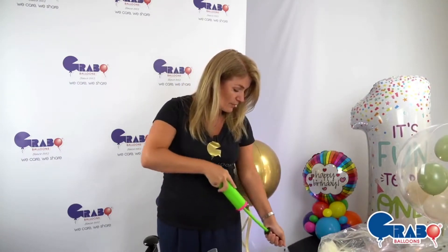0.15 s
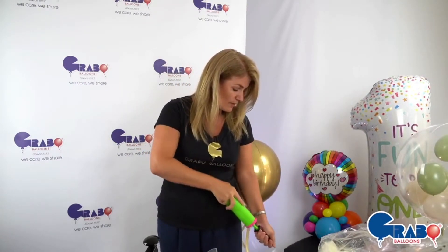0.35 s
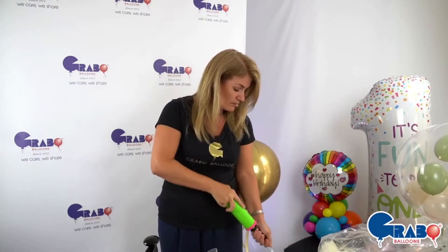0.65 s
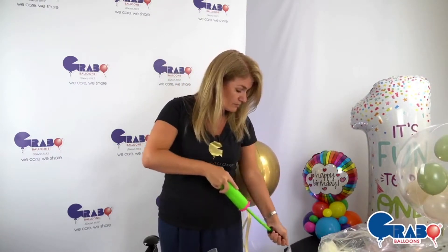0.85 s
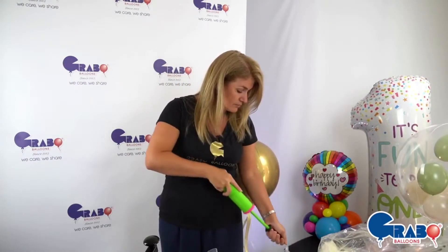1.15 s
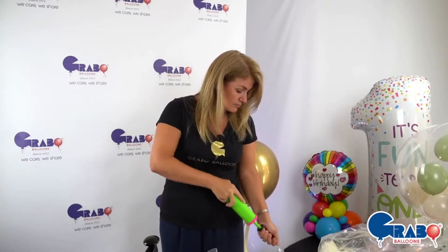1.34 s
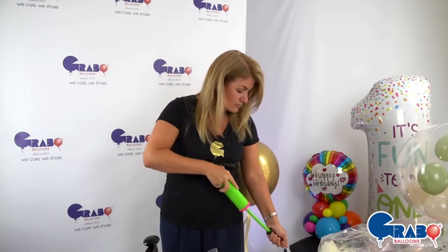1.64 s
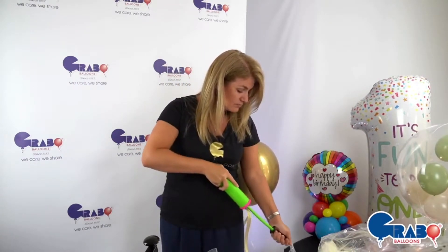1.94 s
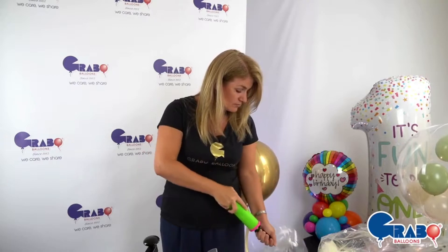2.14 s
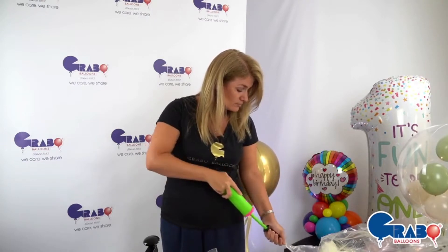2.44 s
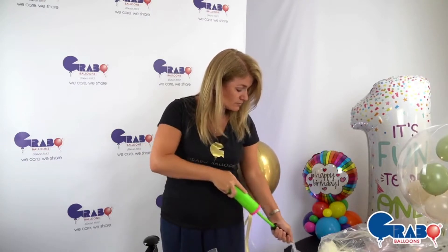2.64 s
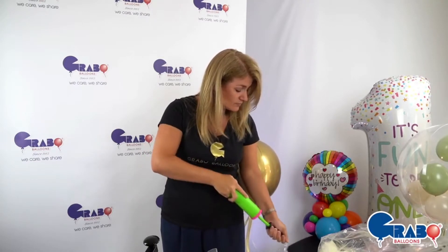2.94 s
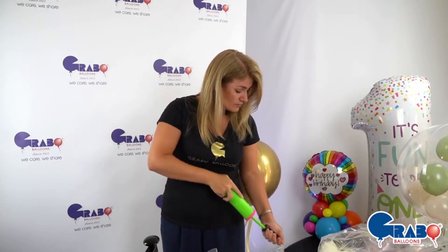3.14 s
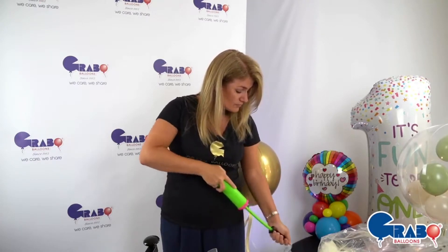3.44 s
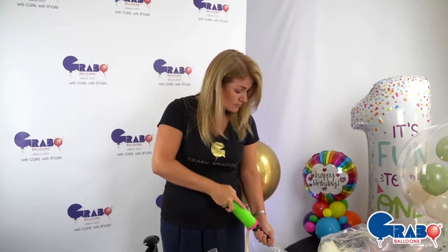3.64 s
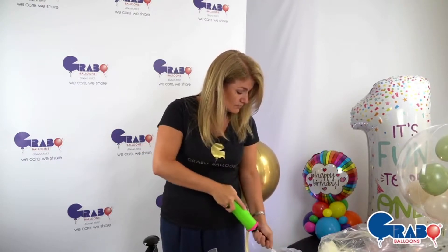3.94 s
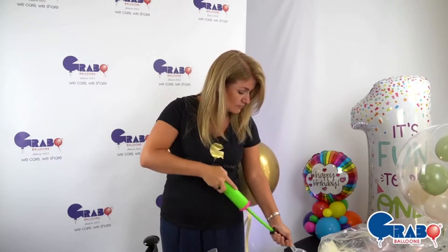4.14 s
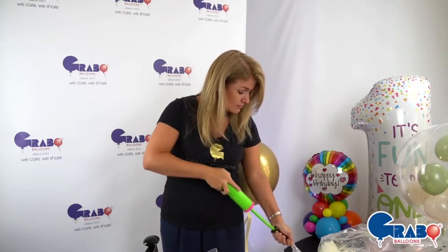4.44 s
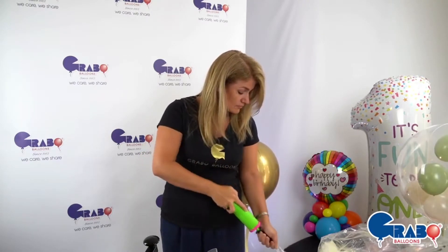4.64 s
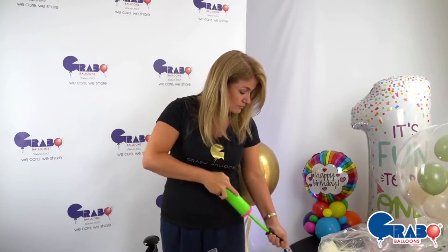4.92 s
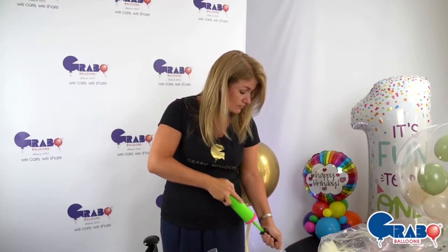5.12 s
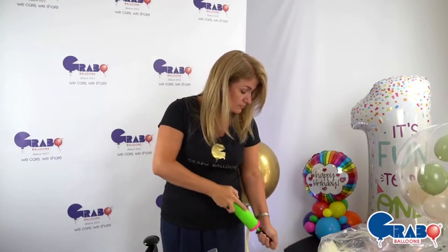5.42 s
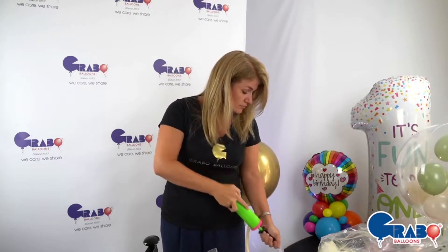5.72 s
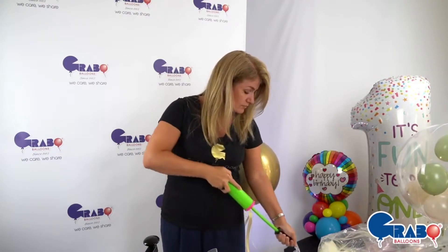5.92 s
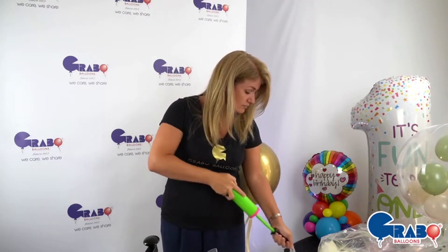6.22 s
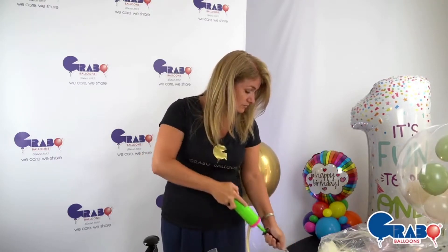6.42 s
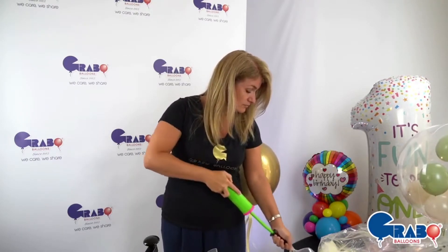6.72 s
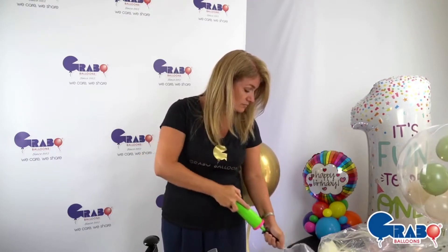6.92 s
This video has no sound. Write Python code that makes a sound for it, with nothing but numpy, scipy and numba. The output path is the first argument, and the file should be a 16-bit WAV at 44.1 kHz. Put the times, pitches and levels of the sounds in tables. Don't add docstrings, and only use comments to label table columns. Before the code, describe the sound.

A plastic hand pump works in brisk, steady back-and-forth strokes, rasping air into a crackling foil balloon, with clicks and knocks at each end.

```python
import sys
import numpy as np
from scipy import signal
from scipy.fft import rfft, irfft, next_fast_len
from scipy.io import wavfile
from scipy.ndimage import uniform_filter1d
from numba import njit

SR = 44100
rng = np.random.default_rng(int(sys.argv[2]) if len(sys.argv) > 2 else 0)


def invert_db(level):
    return 10 ** (np.asarray(level, dtype=float) / 20)


def output_pcm(signal):
    pcm = np.clip(np.atleast_2d(signal).T, -1, 1) * 32767
    wavfile.write(sys.argv[1], SR, np.round(pcm).astype(np.int16))


N = 311654
T = np.arange(N) / SR
POP_DELAY_S = 0.0018
# start in seconds, thump, middle, snap and shudder levels in dB.
POPS = [(1.893, -36, -2, -31, 5), (2.1937, -4, -1.5, -24, 3.5), (2.874, -20, -44, -24, 6),
        (2.924, -23.5, -40, -25, 7), (2.958, -17, -37, -13.5, 1), (3.065, -28, -18, -15, 9.5),
        (3.632, -29, -18, -19, 6), (3.678, -6, -36, -26, -8), (3.799, -25, -35, -11.5, 4),
        (4.01, -14.5, -9, -5, 4.5), (4.1294, -3, 4, -3, -1.5), (4.286, -16.5, -9.5, -9.5, 3),
        (4.328, -40, -19, -34, 1), (4.5, -13.5, -8.5, -10, -13), (4.664, -11.5, -18, -5, 0),
        (4.825, -11.5, -11.5, -9, 5), (5.024, -23, -29, -14, 1), (5.054, -18.5, -13, -8.5, 1),
        (5.3932, -4, 1, -4, -1), (5.574, -9.5, 0.5, -8, 1), (5.791, -20, -14, -15, 1),
        (5.801, -21, -9.5, -8, -11), (6.547, -10, -11.5, -2, 2), (6.676, -17, -27, -14, -11),
        (6.719, -18, -16, -19, -1), (6.79, -23, -31, -28, 1), (6.917, -15, -31, -19, -0.5),
        (7.048, -13.5, -21, -9, -5)]


def rms_one(x):
    return x / np.sqrt(np.mean(x ** 2) + 1e-20)


def at_hz(points, hz):
    table_hz, table_db = np.transpose(points)
    return np.interp(np.log(hz), np.log(table_hz), table_db)


def colour(x, points):
    size = next_fast_len(N)
    hz = np.arange(1, size // 2 + 2) * SR / size
    return irfft(rfft(x, size) * invert_db(at_hz(points, hz)), size)[..., :N]


def band(x, low_hz, high_hz, order=2):
    sos = signal.butter(order, [low_hz, min(high_hz, .45 * SR)], "band", fs=SR, output="sos")
    return signal.sosfilt(sos, x)


def drift(rate_hz):
    r = np.exp(-80 * np.pi * rate_hz / SR)
    slow = signal.lfilter([1], [1, -2 * r, r * r], rng.standard_normal(N // 40 + 2002))[2000:]
    return np.interp(np.arange(N) / 40, np.arange(len(slow)), rms_one(slow))


def ring(clicks, hz, t60_s):
    r, w = invert_db(-60 / (t60_s * SR)), 2 * np.pi * hz / SR
    return signal.lfilter([0, np.sin(w)], [1, -2 * r * np.cos(w), r * r], clicks + 1e-18)


def blows(times, db, contact_s=0.):
    out = np.zeros(N + 999)
    scatter = rng.random((len(times), 4, 2))
    for k, share in enumerate([0.89, -0.99, 1.0, 0.66] if contact_s else [1]):
        delay_s = contact_s * (k + scatter[:, k, 0] * (k > 0))
        at = ((np.asarray(times) + delay_s) * SR).astype(int)
        np.add.at(out, at, invert_db(db) * share * (1 if k == 0 else .5 + scatter[:, k, 1]))
    return out[:N]


@njit
def sweep(x, hz, r, sr):
    out = np.zeros_like(x)
    for i in range(2, len(x)):
        drive = (1 - r * r) / 2 * (x[i] - x[i - 2])
        out[i] = drive + 2 * r * np.cos(2 * np.pi * hz[i] / sr) * out[i - 1] - r * r * out[i - 2]
    return out


def swell(s, spread_s):
    return np.exp(-np.abs(T - s) / max(spread_s, .003))


def strokes():
    # start and stop in seconds, crest and stop levels in dB.
    pull_rows = [(0.006, 0.052, -28.5, -34), (0.27, 0.39, -23, -29.5), (0.621, 0.76, -24.5, -32.5),
                 (0.975, 1.102, -25.5, -25.5), (1.352, 1.483, -26.5, -27), (1.724, 1.905, -25, -30),
                 (2.101, 2.186, -34, -23), (2.492, 2.64, -25.5, -38), (2.833, 3.0, -27, -30.5),
                 (3.198, 3.35, -19.5, -35), (3.562, 3.63, -28, -24), (3.91, 4.04, -26, -29.5),
                 (4.268, 4.39, -21.5, -32.5), (4.622, 4.729, -26.5, -26), (4.976, 5.1, -27, -32),
                 (5.347, 5.47, -28, -29.5), (5.708, 5.821, -24.5, -29), (6.063, 6.16, -29.5, -27),
                 (6.437, 6.56, -28, -24), (6.804, 6.93, -28, -29.5)]
    # start and stop in seconds, crest and stop levels in dB.
    push_rows = [(0.075, 0.177, -26, -27), (0.431, 0.55, -29.5, -30.5), (0.793, 0.907, -26, -32.5),
                 (1.155, 1.284, -28.5, -27.5), (1.524, 1.692, -22.5, -34), (1.898, 2.064, -26, -29),
                 (2.326, 2.45, -30, -35.5), (2.657, 2.802, -26, -32.5), (3.015, 3.116, -28, -27.5),
                 (3.366, 3.454, -28.5, -24), (3.71, 3.85, -41, -32), (4.073, 4.191, -29.5, -25.5),
                 (4.431, 4.53, -27.5, -29), (4.795, 4.936, -25, -33.5), (5.159, 5.253, -27, -24),
                 (5.515, 5.666, -28.5, -28.5), (5.876, 5.988, -27.5, -27.5), (6.244, 6.386, -30, -31.5),
                 (6.638, 6.789, -30.5, -37.5), (6.993, 7.073, -31, -26)]
    pull_rise_s, push_rise_s = 0.046, 0.054
    start, stop, crest_db, stop_db = np.stack([pull_rows, push_rows], axis=1).reshape(-1, 4).T
    push = np.arange(len(start)) % 2 == 1
    crest = start + np.minimum(np.where(push, push_rise_s, pull_rise_s), 0.49 * (stop - start))
    return start, crest, stop, crest_db, stop_db, push


def flow(fall_db_s=330, deepest_db=17, lag_s=0.):
    # time in seconds, level in dB.
    neck_boom = [(0.0, -5), (0.8, 2.5), (1.5, -3.5), (2.15, 3), (2.4, -13), (2.58, -7), (2.9, 4),
                 (3.15, -4), (3.6, 4), (4.3, -2), (4.7, 4.5), (5.3, -2.5), (5.8, 3.5), (6.1, -1.5),
                 (6.7, 5), (7.07, 5.5)]
    push_boom_db = 3
    start, crest, stop, crest_db, stop_db, push = strokes()
    fall_db = np.clip(fall_db_s * (start[1:] - stop[:-1]), 0, deepest_db)
    rest_db = np.r_[crest_db[0], stop_db[:-1] - fall_db]
    times = np.maximum.accumulate(np.ravel([start + lag_s, crest + lag_s, stop + lag_s], "F"))
    speed_db = np.interp(T, times, np.ravel([rest_db, crest_db, stop_db], "F"))
    middle = (crest + stop) / 2
    boom_db = np.interp(middle, *np.transpose(neck_boom)) + push_boom_db * push
    return speed_db, np.interp(T, middle, boom_db)


def rush(patchy_db=2.5):
    # frequency in Hz, density in dB per Hz.
    rush_spectrum = [(150, -68), (239, -69), (381, -10), (700, -5.5), (900, -3.5), (1870, -0.5),
                     (8000, -13.5), (12300, -29)]
    jet_db, boom_db = flow()
    late_db = flow(fall_db_s=415, deepest_db=19.5, lag_s=0.00035)[0] + boom_db - 3.0
    out, together = 0, drift(16.0)
    white = colour(rng.standard_normal((2, 2, N)), rush_spectrum)
    edges_hz = 120 * 2 ** np.arange(0, 7.2, 1 / 3)
    for k, (low, high) in enumerate(zip(edges_hz, edges_hz[1:])):
        boomy = np.clip(np.log2(3800 / low) / 0.84, 0, 1)
        db = boomy * late_db + (1 - boomy) * jet_db
        db += patchy_db * (0.5 * together + 0.78 * drift(13.0))
        db += np.clip(np.log2(low / 7000), 0, 1) * 0.24 * (-25 - jet_db)
        db += (low > 3500) * 1.8 * drift(35)
        out = out + invert_db(db) * band(white[k % 2], low, high)
    return invert_db(-1.2) * out / np.std(band(white[0, 0], 3190, 10300, order=4))


def chamber():
    # start, end and width in Hz, level in dB.
    push_modes = [(3200, 2780, 420, -3), (1460, 1304, 290, -4.5), (4730, 5700, 320, -12)]
    # start and end in Hz, level in dB.
    pull_modes = [(1600, 1760, -8), (780, 600, -13.5), (3430, 3100, -30)]
    start, _, stop, _, _, push = strokes()
    times = np.maximum.accumulate(np.ravel([start, stop], "F"))
    out, jet_db = 0, flow()[0]
    for (push_from, push_to, width, push_db), (pull_from, pull_to, pull_db) in zip(push_modes, pull_modes):
        ends_hz = [np.where(push, push_from, pull_from), np.where(push, push_to, pull_to)]
        hz = np.interp(T, times, np.ravel(ends_hz, "F")) * invert_db(0.18 * drift(11.0))
        db = np.interp(T, times, np.where(push, push_db, pull_db).repeat(2))
        r = np.exp(-np.pi * width / SR)
        flutter_db = 2.2 * drift(12)
        noise = rng.standard_normal((2, N)).ravel()
        tone = rms_one(sweep(noise, np.tile(hz, 2), r, SR)).reshape(2, N)
        out = out + invert_db(jet_db + db + flutter_db) * tone
    return out


def whistle(centre_hz=8000., sag_hz_per_s=610):
    # peak in seconds, spread in seconds, level in dB.
    whistle_rows = [(0.13, 0.018, -26), (0.515, 0.014, -24), (0.845, 0.022, -28), (1.2, 0.0044, -27),
                    (1.575, 0.0068, -39), (3.068, 0.028, -34), (3.42, 0.013, -32.5), (3.795, 0.018, -32),
                    (5.256, 0.01, -24), (5.944, 0.013, -32), (6.315, 0.022, -27), (7.053, 0.0064, -20.5)]
    r, hz, gain = np.exp(-np.pi * 100 / SR), np.full(N, centre_hz), np.zeros(N)
    for s, spread_s, db in whistle_rows:
        near = np.abs(T - s) < 0.07
        hz[near] = centre_hz - sag_hz_per_s * (T[near] - s)
        gain += near * invert_db(db) * swell(s, spread_s)
    tone = sweep(sweep(rng.standard_normal(N), hz, r, SR), hz, r, SR)
    return uniform_filter1d(gain, size=500) * rms_one(tone)


def bottom_knocks():
    # start in seconds, peak in dB, low thud in dB.
    knock_rows = [(0.21, -14, -6), (0.5647, -14.5, -4.5), (0.916, -13.5, -5.5), (1.306, -13.5, -2.5),
                  (1.689, -19, 2.5), (2.0535, -15.5, 2), (2.4552, -30.5, 5.5), (2.7922, -15.5, -4.5),
                  (3.145, -17, -4), (3.499, -13, -4.5), (3.8754, -17.5, -6), (4.206, -11.5, -7),
                  (4.554, -15.5, -3), (4.9275, -13.5, -5), (5.2992, -17, -1), (5.659, -11, -5),
                  (6.01, -11.5, -7), (6.391, -21, 3)]
    # mode in Hz, t60 in seconds.
    barrel_modes = [(255, .03), (1124, .062), (2146, .075), (2720, .03)]
    s, db, thud_db = np.transpose(knock_rows)
    s = s + .0005
    touch = blows(s, db)
    out = invert_db(1.5) * ring(touch, 2240, 0.0071) - invert_db(-6.5) * ring(touch, 407, 0.024)
    mode_db = [thud_db, 2, -6 + rng.normal(0, 1.5, len(s)), -12]
    for (hz, t60_s), rel_db in zip(barrel_modes, mode_db):
        out += ring(blows(s + 0.00063, db + rel_db), hz, t60_s)
    return out


def cap_clicks():
    # start in seconds, peak in dB, pan in dB, ring in Hz.
    click_rows = [(0.03, -12.5, 1, 3300), (0.3902, -13, -1, 3250), (0.7426, -12, -1, 3150),
                  (1.1064, -8, -2, 3170), (1.4955, -3, -2.5, 3130), (1.946, -14, -1.06, 3180),
                  (2.6189, -8, -4.5, 2900), (2.9769, -6.5, -1, 3130), (3.3212, -10, -2, 3150),
                  (3.6955, -18, -1, 3150), (4.0439, -11, -2, 3050), (4.383, -9.5, -1, 3050),
                  (4.741, -10, -2, 3000), (5.108, -8, -5, 3090), (5.4717, -6.5, -2, 2940),
                  (5.8321, -8.5, -1, 2970), (6.1984, -8.5, -5, 2950), (6.549, -13, -1, 3030),
                  (6.931, -10, -1, 2950)]
    out = np.zeros((2, N))
    for s, db, pan_db, hz in click_rows:
        i = int(s * SR)
        hit = np.r_[invert_db(db), np.zeros(1500)]
        plastic = invert_db(-1) * ring(hit, 1.04 * hz, .009) + invert_db(-2) * ring(hit, .95 * hz, .009)
        plastic -= invert_db(-6) * ring(hit, .62 * hz, .007) + invert_db(-9) * ring(hit, .47 * hz, .006)
        click = invert_db(3) * plastic
        click += invert_db(-10.5) * ring(np.roll(hit, 110), 510, 0.0089) + invert_db(-14.0) * ring(hit, 277, 0.027)
        click = signal.sosfilt(signal.butter(4, 1.2 * hz, fs=SR, output="sos"), click)
        out[:, i:i + len(hit)] += click * invert_db([[pan_db / 2], [-pan_db / 2]])
    return out


def valve_ticks():
    # start in seconds, peak in dB.
    tick_rows = [(0.081, -18.5), (0.444, -23), (0.791, -19), (1.173, -19), (1.545, -10.5), (2.299, -22.5),
                 (2.67, -15), (3.02, -11), (3.375, -17.5), (3.748, -23), (4.089, -16.5), (4.442, -16),
                 (4.81, -15.5), (5.181, -15), (5.541, -12.5), (5.896, -13), (6.262, -12.5), (6.638, -19),
                 (7.012, -11.5)]
    s, db = np.transpose(tick_rows)
    out = ring(blows(s, db + 2.5), 1330, .01) - ring(blows(s, db - 1), 600, .009)
    return out + ring(blows(s, db - 12), 280, .02)


def seal_snaps():
    # start in seconds, peak in dB.
    snap_rows = [(0.251, -15.5), (0.604, -20.5), (0.963, -20), (1.343, -34), (1.71, -21), (2.088, -20),
                 (2.479, -26), (2.825, -29), (3.178, -27), (3.552, -24), (3.9, -25), (4.243, -21),
                 (5.4568, -12), (6.051, -24)]
    s, db = np.transpose(snap_rows)
    s = s + .001
    return ring(blows(s, db + 5.0), 600, 0.002) + ring(blows(s, db + 1), 1500, 0.003)


def squeaks(length_s=0.03):
    # time in seconds, peak in dB.
    squeak_rows = [
        (0.0722, -30),
        (1.1576, -30),
        (4.0805, -31),
        (4.4296, -31),
        (5.167, -25.5),
        (5.881, -29),
        (6.996, -28),
    ]
    out, t = np.zeros(N), np.arange(int(length_s * SR)) / SR
    hz = 1500 + 2250 * np.sin(np.pi / 2 * t / length_s)
    chirp = np.sin(2 * np.pi * np.cumsum(hz) / SR) * np.hanning(len(t))
    for s, db in squeak_rows:
        i = int((s - .009) * SR)
        out[i:i + len(t)] += invert_db(db - 2.5) * chirp
    return out


def pops(shudder_t60_s=0.17, shudder_gain_db=-28.5, puff_hz=67, puff_db=0.5):
    # mode in Hz, level in dB, t60 in seconds.
    skin_modes = [(292, -9, 0.14), (398, -5.5, 0.077), (245, -16, 0.037), (550, -28, 0.016),
                  (720, -1, 0.012)]
    s, thump_db, _, _, shudder_db = np.transpose(POPS)
    s = s + POP_DELAY_S
    shakes = np.abs(blows(s + 0.0023, thump_db + shudder_gain_db + shudder_db))
    fade = signal.lfilter([1], [1, -invert_db(-60 / (shudder_t60_s * SR))], shakes)
    out = sum(invert_db(db) * ring(fade * rng.standard_normal(N), hz, t60_s) for hz, db, t60_s in skin_modes)
    out += ring(blows(s + 0.00406, thump_db - 9.5), 297.6, 0.062)
    out += ring(blows(s + 0.0038, thump_db - 12.5), 404, 0.05)
    out += ring(blows(s + 0.00036, thump_db + 9), 365, .014) - ring(blows(s, thump_db - 9), 662, 0.019)
    out += ring(blows(s, 0.87 * thump_db + puff_db), puff_hz, 0.029)
    return signal.lfilter([.15], [1, -.85], out)


def cracks():
    # start in seconds, middle and snap levels in dB.
    crease_rows = [(0.656, -39, -16), (1.907, -13.5, -28), (3.223, -38, -15), (3.631, -28, -17),
                   (4.642, -36, -17), (4.891, -24, -6.5), (5.007, -30, -22), (6.133, -23, -29),
                   (6.342, -22, -10), (6.357, -35, -8), (6.471, -42, -9), (6.891, -22, -25)]
    folds = np.transpose(POPS)[[0, 2, 3]]
    s, middle_db, snap_db = np.c_[folds, np.transpose(crease_rows)]
    s = s + POP_DELAY_S
    out = ring(blows(s, middle_db - 1.0, contact_s=0.00068), 830, 0.008)
    out += ring(blows(s, snap_db - 0.5, contact_s=0.000801), 1800, 0.0035)
    return out + ring(blows(s, snap_db - 9, contact_s=0.00047), 2900, 0.002)


def low_bumps():
    # start in seconds, peak in dB.
    bump_rows = [
        (1.495, -14),
        (2.196, 19.5),
        (4.011, -15),
        (4.133, -8),
        (4.34, -9),
        (4.5, -15),
        (5.395, 10),
        (5.808, 0.5),
        (5.95, -9),
    ]
    push = signal.lfilter([.01], [1, -.99], blows(*np.transpose(bump_rows)))
    return ring(push, 37, 0.045)


def pings():
    # start in seconds, peak in dB, pitch in Hz, t60 in seconds.
    ping_rows = [(0.117, -17.5, 2900, 0.035), (1.588, -17, 1174, 0.072), (4.3017, -9.5, 1190, 0.071),
                 (5.042, -15.5, 1670, 0.048), (5.6198, -29, 2780, 0.032), (5.933, -23, 1370, 0.047),
                 (5.952, -28, 1330, 0.062), (5.982, -15.5, 3020, 0.078), (6.351, -9, 1283, 0.046),
                 (2.1961, 2, 370, 0.025), (6.549, -8.5, 2020, 0.045), (6.913, -11, 1450, 0.02),
                 (6.926, -11.5, 890, 0.035)]
    return sum(ring(blows([s], db), hz, t60_s) for s, db, hz, t60_s in ping_rows)


def flicks(ring_cycles=7.8):
    # start in seconds, peak in dB, pitch in Hz.
    flick_rows = [(1.46, -18, 1500), (1.7598, -13, 1700), (1.9089, 2, 1292), (2.719, -13.5, 1300),
                  (2.8763, -14, 1400), (2.907, -15, 1300), (2.9193, -11, 1500), (2.9263, -21, 1400),
                  (2.927, -9, 1500), (2.9605, -4, 1410), (2.971, -9, 1800), (3.0372, -10, 1500),
                  (3.0907, -14, 1510), (3.6003, -11, 1600), (3.6083, -15, 1500), (3.637, -17, 1300),
                  (3.6634, -7, 1600), (3.6801, -0.5, 2050), (3.9697, -13, 1090), (4.0117, -9, 1100),
                  (4.5045, -22, 1300), (5.0554, -5, 1230), (5.367, -13, 2220), (5.7302, -16, 910),
                  (5.7605, -7, 2200), (5.795, -4.5, 1400), (4.1323, 1, 1550), (5.3951, 0.5, 1600),
                  (5.5762, 1, 1700), (6.549, -5, 1500), (6.346, -11, 1310), (6.6782, -14, 1200),
                  (6.793, -16, 1330)]
    out = np.zeros(N)
    for s, db, hz in flick_rows:
        i = int(s * SR)
        out[i:i + 600] -= ring(np.r_[invert_db(db + 2.0), np.zeros(599)], hz, ring_cycles / hz)
    return out


def rustle(creak_db=-82):
    # peak in seconds, level in dB, spread in seconds.
    unfold_rows = [(0.0, -29, 0.19), (0.97, -65, 0.092), (1.3, -44, 0.073), (1.62, -27.5, 0.39),
                   (2.08, -51, 0.056), (2.549, -30, 0.034), (2.97, -21.5, 0.12), (3.11, -37, 0.088),
                   (3.5, -32.5, 0.57), (4.1, -33, 0.21), (4.89, -27, 0.03), (5.4, -26, 0.2),
                   (5.89, -43, 0.11), (6.1, -37, 0.41), (6.89, -23.5, 0.11)]
    gain = invert_db(creak_db) + sum(invert_db(db - 7.0) * swell(s, spread_s) for s, db, spread_s in unfold_rows)
    sizes = invert_db(3.8 * np.minimum(rng.exponential(1, N), 5)) * rng.choice([-1, 1], N)
    born = rng.random(N) < 1500 * invert_db(5 * drift(20)) / SR
    grains = band(sizes * born, 260, 566) + invert_db(-1.5) * band(sizes * born, 860, 2200)
    return gain * rms_one(grains)


def hums(t60_s=0.042):
    # peak in seconds, spread in seconds, level in dB, pitch in Hz.
    hum_rows = [(0.121, .02, -30, 3240), (0.31, 0.013, -25, 1870), (0.48, .008, -27, 2970),
                (0.83, 0.032, -30.5, 3200), (1.598, .02, -26, 3320), (4.11, .008, -29, 1350),
                (6.028, .035, -31, 3020), (1.42, 0.025, -27.5, 1170), (1.95, 0.02, -22.5, 3220),
                (2.035, 0.018, -22, 720), (2.11, 0.009, -31, 560), (2.16, 0.016, -46, 590),
                (2.225, 0.027, -20.5, 780), (2.26, 0.017, -24, 550), (2.35, 0.017, -45, 3300),
                (2.354, 0.0084, -40, 1200), (2.379, 0.008, -31, 3020), (2.4, .012, -29, 2620),
                (2.415, 0.017, -32, 2980), (2.435, 0.032, -34, 2280), (2.43, 0.035, -37, 4460),
                (2.52, 0.0085, -31.5, 654), (2.554, 0.011, -32.5, 580), (3.051, 0.034, -28, 3140),
                (3.635, 0.0049, -40, 1810), (3.67, 0.014, -29.5, 720), (3.95, 0.028, -39, 805),
                (4.143, 0.0082, -24, 920), (4.18, 0.03, -22, 1450), (4.66, 0.012, -27, 580),
                (4.96, 0.0099, -40, 477), (5.049, 0.043, -26.5, 1117), (5.405, 0.0051, -20, 790),
                (5.585, 0.0083, -22, 820), (5.593, 0.0064, -19, 417), (5.62, 0.031, -31.5, 810),
                (5.73, .012, -32, 833), (5.94, 0.028, -33.5, 425), (6.101, 0.011, -33.5, 920),
                (6.14, 0.013, -30, 654), (6.489, 0.01, -31, 550), (6.488, 0.012, -34, 960),
                (6.58, 0.0071, -19.5, 645), (6.689, 0.012, -18, 438), (6.696, 0.0079, -22, 1150),
                (6.735, 0.04, -28, 770), (6.871, 0.0098, -31, 1680), (6.885, 0.023, -30, 820),
                (6.94, 0.015, -20, 750)]
    out, t = np.zeros(N + 9000), np.arange(-4000, 4000) / SR
    for (s, spread_s, db, hz), noise in zip(hum_rows, rng.standard_normal((len(hum_rows), len(t)))):
        i = int(s * SR) - 4000
        breath = np.exp(-(t / max(spread_s, .003)) ** 2)
        out[i:i + len(t)] += invert_db(db) * breath * rms_one(ring(noise, hz, t60_s))
    return out[:N]


def room(x, t60_s=0.22, level_db=-10):
    t = np.arange(int(.4 * SR)) / SR
    tail = rng.standard_normal(len(t)) * invert_db(-60 * t / t60_s) * np.clip((t - .003) / 0.0012, 0, 1)
    tail = signal.lfilter([1], [1, -.55], tail)
    return invert_db(level_db) * signal.fftconvolve(x, tail / np.linalg.norm(tail))[:N]


def room_hush(level_db=-40.5):
    # frequency in Hz, density in dB per Hz.
    hush_spectrum = [(18, -20), (60, 4.5), (274, -16.5), (815, -13), (953, -31), (3070, -4), (6200, -13),
                     (15000, -25)]
    return invert_db(level_db) * rms_one(colour(rng.standard_normal(N), hush_spectrum))


def scene():
    # frequency in Hz, level in dB.
    side_spectrum = [(90, -16), (240, -33), (480, -31), (1200, -23.5), (2100, -22), (3770, -6.5),
                     (7520, -12), (15000, -9.5)]
    # frequency in Hz, left minus right in dB.
    lean_rows = [(200, 0), (1300, -.2), (2500, -2.4), (6000, -1.1), (14000, -.5)]
    stops = cap_clicks() + bottom_knocks() + valve_ticks() + seal_snaps()
    foil = pops() + cracks() + low_bumps() + pings() + flicks()
    hits = stops.mean(axis=0) + squeaks() + foil
    air, air_apart = rush() + chamber()
    small = whistle() + rustle() + hums() + room_hush()
    mid = air + small + hits + room(hits, t60_s=.3, level_db=-19)
    apart = invert_db(1.5) * air_apart + room(small + invert_db(-3.0) * hits, t60_s=0.033, level_db=2.0)
    side = colour(apart, side_spectrum) + band(stops[0] - stops[1], 1200, 9000) / 2
    lean = np.array(lean_rows) * [1, .5]
    return np.array([colour(mid + side, lean), colour(mid - side, lean * [1, -1])])


def gain_control(x, above_db=-19.5, share=0.5, recover_db_s=23.5):
    level_db = 10 * np.log10(uniform_filter1d(np.mean(x ** 2, axis=0), size=882) + 1e-12)
    held_db = np.maximum.accumulate(share * (level_db - above_db) + recover_db_s * T)
    over_db = np.maximum(held_db - recover_db_s * T, 0)
    return x * invert_db(-signal.lfilter([.001], [1, -.999], over_db))


def patchy_bands(x, mono_below_hz=2000, mono_share=.55):
    # frequency in Hz, share of bands left empty.
    empty_rows = [(6000, 0), (7500, .08), (9500, .3), (14000, .45), (15200, .75), (15850, 1)]
    hz, s, z = signal.stft([x[0] + x[1], x[0] - x[1]], SR, nperseg=1024)
    luck = uniform_filter1d(rng.standard_normal((74, len(s))), size=5, axis=1)
    luck = luck.repeat(7, axis=0)[:len(hz)]
    rank = 1 / (1 + np.exp(-3.8 * luck))
    level_db = 10 * np.log10(np.mean(np.abs(z[0, hz > 7000]) ** 2, axis=0) + 1e-14)
    louder_db = level_db - np.median(level_db)
    share = np.interp(hz, *np.transpose(empty_rows))[:, None]
    share = share ** np.clip(1 + .04 * louder_db, .5, 1.5)
    whole = uniform_filter1d(rng.standard_normal(len(s)), size=5)
    mono_rank = 1 / (1 + np.exp(-3.0 * (.6 * whole + .7 * luck - .05 * louder_db)))
    mono = (mono_rank < mono_share) & (hz < mono_below_hz)[:, None]
    z = z * (rank >= share) * [np.ones_like(mono), ~mono]
    mid, side = signal.istft(z, SR, nperseg=1024)[1][:, :N] / 2
    return np.array([mid + side, mid - side])


def low_pass(x):
    return signal.sosfilt(signal.butter(12, 16470, fs=SR, output="sos"), x)


def record(dry):
    x = signal.sosfilt(signal.butter(3, 185, "high", fs=SR, output="sos"), dry) - invert_db(-54.0) * dry
    x = gain_control(x)
    x = x / (1 + np.abs(x / .95) ** 6) ** (1 / 6)
    return low_pass(patchy_bands(x))


dry = scene()
out = record(dry)
output_pcm(out)
```